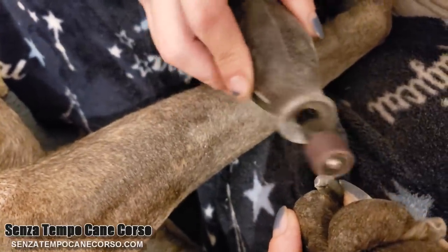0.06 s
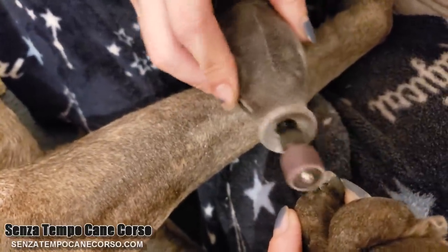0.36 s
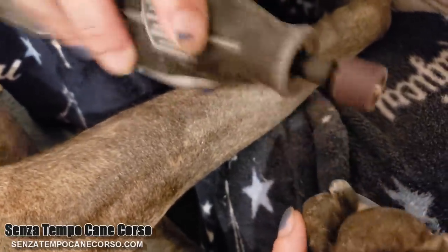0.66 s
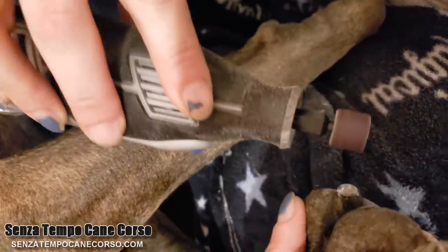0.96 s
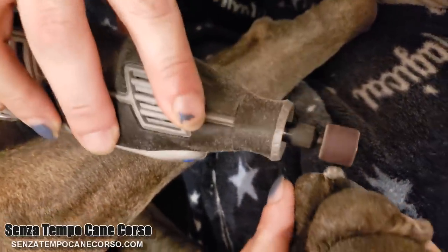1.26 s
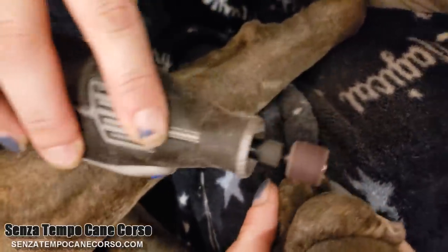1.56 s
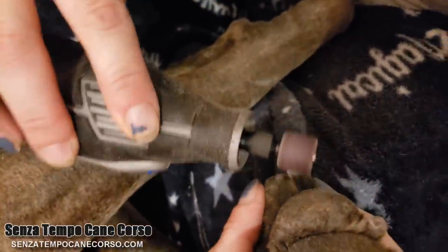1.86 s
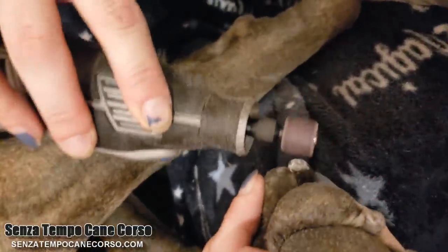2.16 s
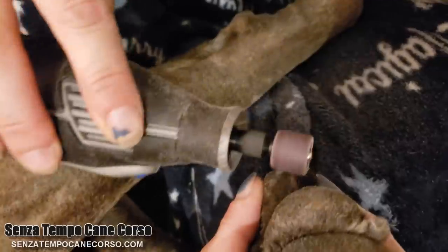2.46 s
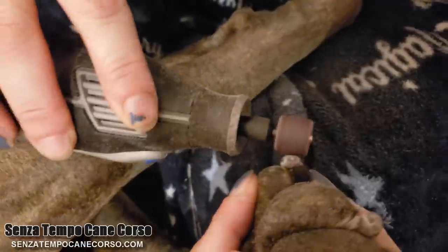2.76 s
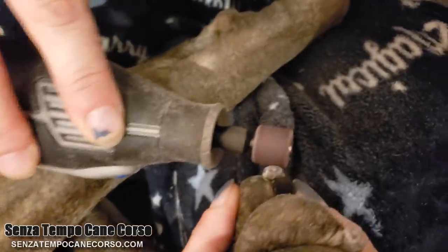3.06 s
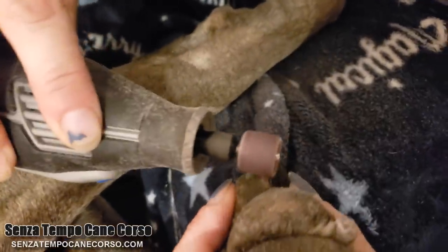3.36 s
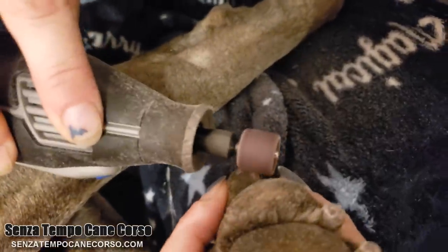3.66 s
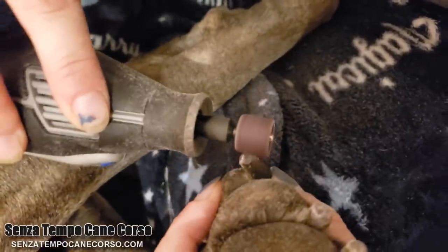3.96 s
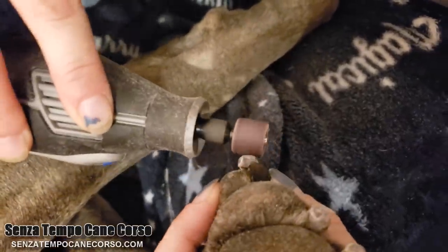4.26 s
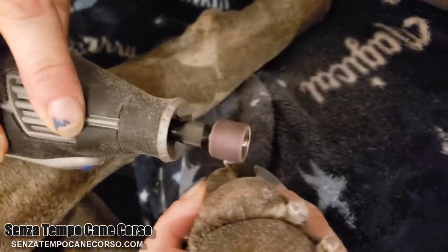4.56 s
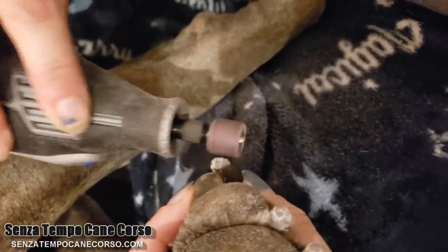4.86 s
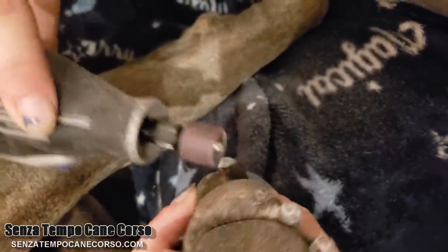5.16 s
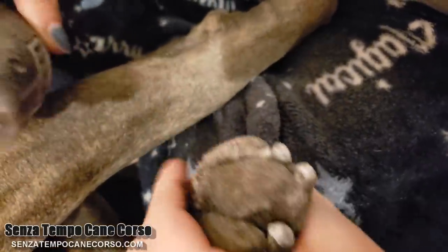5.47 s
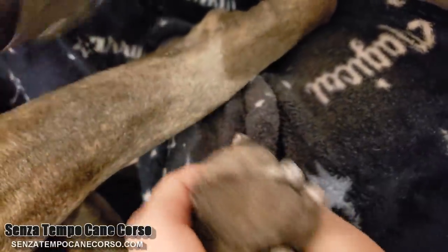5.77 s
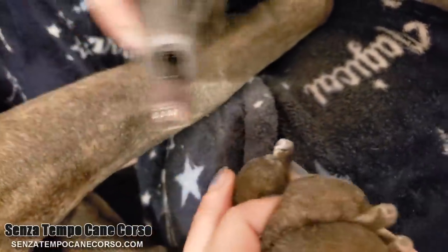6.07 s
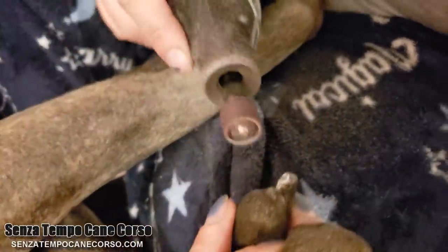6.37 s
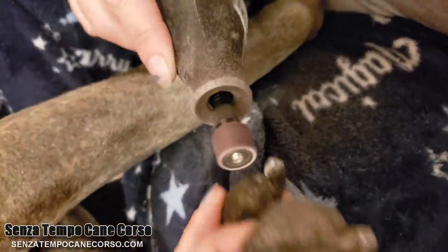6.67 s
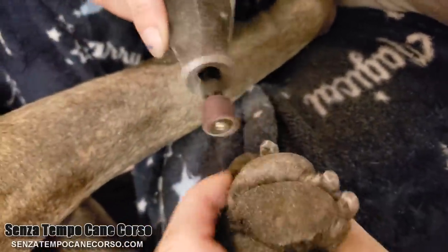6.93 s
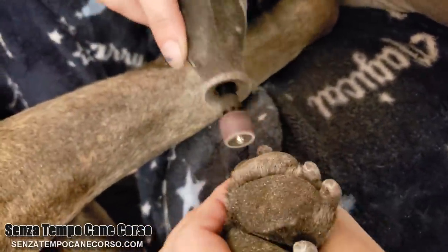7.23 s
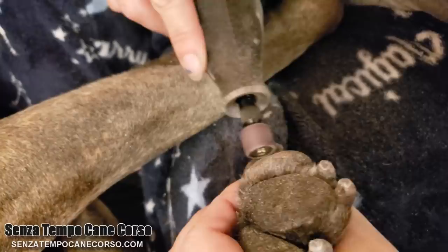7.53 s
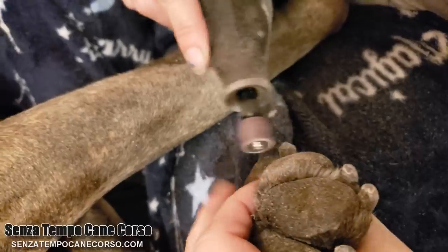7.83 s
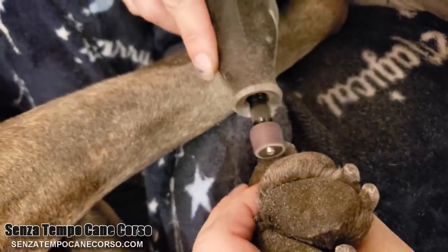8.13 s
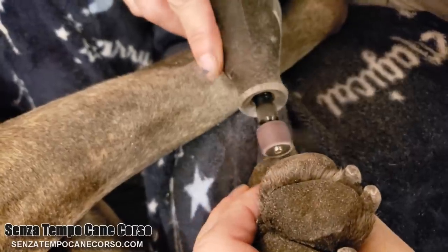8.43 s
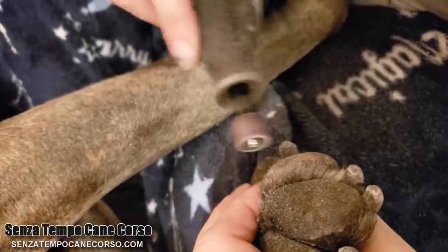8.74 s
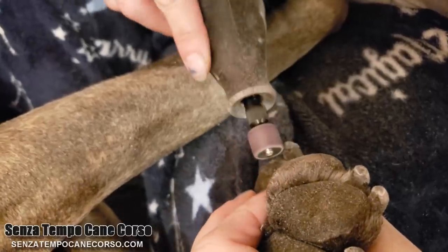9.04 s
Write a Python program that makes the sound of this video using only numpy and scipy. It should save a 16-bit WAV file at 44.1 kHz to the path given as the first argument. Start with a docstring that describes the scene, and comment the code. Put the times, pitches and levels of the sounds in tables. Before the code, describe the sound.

A handheld rotary tool whines steadily up close, rasping against a dog's nails in short strokes that make its pitch sag.

```python
"""A handheld rotary tool with a sanding drum grinds a dog's nails, close to the microphone.
From the start the shaft whines, the brushes buzz once per turn, and the shaft whirls and rattles in
its bearing at just under half speed. From 0.2 to 5.1 s, short strokes: the eccentric drum scrapes the
nail once per turn, snags and drags the speed down. Near 6 s the tool swings nose-on with a swish and
the paw is turned over with a soft shuffle. Two more strokes follow at 7.6 and 8.3 s."""
import sys
import numpy as np
from scipy import signal
from scipy.fft import rfft, irfft, next_fast_len
from scipy.io import wavfile
from scipy.ndimage import uniform_filter1d

SR = 44100
rng = np.random.default_rng(int(sys.argv[2]) if len(sys.argv) > 2 else 0)


def materialize(psi):
    """Save the field psi as 16-bit PCM at rate SR to the path in sys.argv[1].

    A 1-D psi becomes a single channel; in a 2-D psi each row is a channel.
    """
    bounded = np.clip(np.atleast_2d(psi).T, -1, 1)
    quanta = np.round(bounded * 32767).astype(np.int16)
    wavfile.write(sys.argv[1], SR, quanta)


N = 405719
TIME = np.arange(N) / SR

# Table levels are relative. nose: 0 = flank to the microphone, 1 = nose to it.
# tool pose: t/s, nose, motor level/dB
POSE = [(0, 0.46, 1.5), (.5, 0.53, 0), (.8, 0.053, 3), (1.3, 0.054, 2.5), (2.2, 0.059, 0.5),
        (2.75, 0.055, 0), (3.05, 0.019, 3), (3.5, 0.035, -1.5), (5.2, 0.012, -1.5), (5.55, 0.2, -0.5),
        (6.15, 0.83, 0.5), (6.55, 0.86, 1.5), (7.1, 0.98, 0.5), (7.5, 1, 4.5), (7.85, 0.97, 2),
        (8.25, 1, 3.5), (8.7, 0.95, 0), (9.2, 0.95, 1.5)]
# shaft tones: shaft order, flank-on/dB, nose-on/dB, left minus right/dB
SHAFT_TONES = [(2, -65.5, -80.5, 6), (4, -64, -59.5, 3), (5, -69, -56, 1), (6, -50.5, -51.5, 12),
               (9, -59, -59, 6), (18, -60, -60.5, 3), (19, -64, -52.5, -9), (20, -61, -63, 18),
               (22, -58.5, -67, -14), (30, -51, -58, 9), (33, -60, -57, 3), (45, -53, -61, 6),
               (65, -66, -56, 3), (66, -69, -53, 3)]
# whirl beating with the shaft: shaft order, whirl order, flank-on/dB, nose-on/dB
WHIRL_SIDEBANDS = [(3, -1, -68, -58), (3, 1, -95, -64), (5, 1, -58.5, -57.5), (6, -2, -66, -56.5),
                   (8, 1, -60.5, -62.5), (8, -2, -57, -61), (9, -2, -56, -65.5), (18, -1, -78, -60),
                   (19, -1, -76, -53)]
# once-per-turn part over the hiss: f/Hz, motor/dB, drum/dB
PERIODIC_RATIO = [(500, -8, 12), (2500, -7, 17), (4000, -3, 17), (6000, 0, 16), (8500, -6, 7),
                  (11500, 2, 3), (15000, 5, 1.5)]
# likeness of the two microphone ports: f/Hz, coherence
PORT_COHERENCE = [(300, 0.79), (1200, 0.64), (4000, 0), (9000, 0), (15000, 0.2)]
# buzz spectra, nose-on and flank-on: f/Hz, left/dB, right/dB
BUZZ_NOSE = [(256, -85, -92.5), (526, -85, -80), (800, -85.5, -79), (1150, -73.5, -80.5),
             (1590, -76.5, -85), (2100, -79, -77), (2680, -73, -82.5), (3020, -100.5, -107),
             (3400, -70.5, -75), (3610, -73, -79), (4630, -71.5, -75), (6450, -78.5, -85.5),
             (7230, -77, -87), (8100, -74.5, -72), (8650, -74.5, -65.5), (9500, -80.5, -82),
             (10400, -77.5, -76), (11850, -75.5, -67.5), (13200, -72, -74), (15400, -82, -75.5)]
BUZZ_FLANK = [(278, -91.5, -95), (780, -85, -88.5), (950, -73, -90), (1390, -77.5, -81), (1650, -67.5, -86),
              (2110, -80, -84.5), (2700, -75.5, -65.5), (2860, -73, -82), (3350, -71.5, -71.5),
              (4100, -85.5, -92.5), (4740, -75.5, -68.5), (5150, -70, -80), (6350, -72.5, -83),
              (6960, -74.5, -99), (7680, -67.5, -83), (8630, -71.5, -73.5), (9100, -74, -81.5),
              (10500, -74, -78.5), (12000, -70, -76), (14000, -77, -72), (15600, -68, -90)]
# bearing rattle: t/s, left/dB, right/dB
RATTLE_LEVEL = [(0, -42, -47), (.45, -37.5, -42), (.8, -47, -42), (1.7, -50, -37.5), (2.9, -48, -40),
                (3.3, -42, -35.5), (3.55, -50, -40), (3.8, -39, -39), (4.15, -52, -47), (4.86, -61, -59),
                (5.2, -51, -43), (5.45, -38.5, -50), (5.75, -40.5, -49), (5.95, -35.5, -43),
                (6.2, -36.5, -50), (6.5, -32.5, -43), (7.1, -35, -41), (7.45, -33.5, -38),
                (8.1, -37, -43.5), (9.2, -35, -42)]
# housing burr: t/s, level/dB
BURR_LEVEL = [(0, -42), (.9, -49.5), (2.87, -47), (3.5, -44), (4.86, -54), (5.2, -47), (5.4, -42),
              (5.55, -43), (5.75, -53), (5.95, -56), (6.5, -64), (7.45, -48), (7.95, -47), (9.2, -44.5)]
# brush sizzle: t/s, left/dB, right/dB
BRUSH_SIZZLE_LEVEL = [(0, -49, -44), (.45, -52, -45), (1.0, -51, -42), (1.7, -42, -45), (2.87, -47, -50),
                      (3.5, -39, -50), (4.3, -43, -55), (5.2, -43, -54), (5.75, -45, -44), (5.95, -37, -33),
                      (6.2, -43, -42), (6.45, -32, -36.5), (6.95, -40, -34.5), (7.15, -36.5, -41),
                      (7.45, -34, -37), (7.95, -46, -47), (8.2, -42, -41), (8.8, -52, -53),
                      (9.15, -33, -42)]
# room spectrum: f/Hz, left/dB, right/dB
ROOM_SPECTRUM = [(20.3, -105, -106), (45, -95, -96), (57.3, -84, -80), (76, -102, -103), (201, -103, -103),
                 (1000, -115, -115)]
# drum on nail: start/s, length/s, speed drag/Hz, thrum/dB, nail pitch ratio
STROKES = [ (.1735, .08, 62, -64, .93), (1.337, 0.2, 33, -66, .97), (1.768, 0.17, 28.7, -68, .97),
           (2.258, 0.027, 94, -75, .96), (2.324, .385, 27.6, -64.5, .93), (3.035, 0.17, 26, -70.5, .98),
           (3.203, 0.25, 40, -73, 1), (3.534, 0.011, 11, -78, 1), (3.599, 0.42, 40, -75, .99),
           (4.354, .157, 46.6, -70, 1.04), (4.545, 0.19, 43.5, -67, 1.02), (4.951, 0.14, 52, -79, 1.04),
           (7.566, .19, 26, -66, 1), (8.298, 0.3, 23.3, -71, 1), ]
# contact: t/s, scrape/dB, sizzle/dB, nail ring/dB, sizzle f/Hz, skip (0 pressed on, 1 once per turn)
CONTACT = [(0.177, -35, -37, -22.5, 14100.0, 0.31), (0.187, -29, -28.5, -21, 13500.0, 0.38),
           (0.21, -26, -26, -28, 14600.0, 0.81), (0.235, -29, -22, -31, 13700.0, 0.37),
           (0.252, -35, -24, -33, 14300.0, 0.58), (1.342, -25.5, -26, -37, 13600.0, 0.18),
           (1.375, -32.5, -29, -39, 13300.0, 0.43), (1.41, -23, -25, -36, 13400.0, 0.79),
           (1.447, -24.5, -37, -34, 12800.0, 0.5), (1.47, -25, -31, -39, 14300.0, 0.11),
           (1.505, -24.5, -23, -44, 14900.0, 0.11), (1.535, -27.5, -25, -39, 14900.0, 0.19),
           (1.778, -26.5, -27, -59, 14600.0, 0.02), (1.82, -29.5, -35, -43, 14400.0, 0.24),
           (1.87, -26, -28, -44, 14570, 0.023), (1.935, -25, -26, -36, 14580, 0.3),
           (2.263, -26, -30, -23.5, 12900.0, 0.35), (2.273, -24.5, -22, -28, 13140, 0.33),
           (2.286, -26, -34, -31, 13860, 0.32), (2.335, -27, -31, -32, 12400.0, 0.79),
           (2.375, -33, -31, -47, 14900.0, 1), (2.42, -24, -26, -30, 14400.0, 0.23),
           (2.47, -30, -28, -33, 13880, 0.4), (2.53, -29, -23, -35.5, 15500, 0.1),
           (2.61, -24, -30, -29.5, 13780, 0.02), (2.665, -26, -24, -31, 14360, 0.63),
           (2.685, -31, -38.0, -47, 15000, 0.48), (2.705, -25, -29, -39, 14900.0, 0.67),
           (3.045, -29.5, -35, -33.5, 12100.0, 0.48), (3.08, -32.5, -42, -38, 12520, 0.071),
           (3.13, -30, -38, -31.5, 12300.0, 0.26), (3.185, -26, -29, -37, 15200, 0.86),
           (3.235, -30.5, -26, -30.5, 14200, 0.35), (3.28, -32, -25, -45, 14600.0, 0.43),
           (3.3, -24.5, -24, -32, 14700, 0.11), (3.37, -26.5, -23.5, -55, 14190, 0.037),
           (3.445, -26, -27, -41, 14900.0, 0.14), (3.54, -38, -36.5, -43, 15200, 0.97),
           (3.605, -31.5, -30, -42, 15200, 0.02), (3.68, -30.5, -30, -57, 15060, 0.021),
           (3.74, -28.5, -28, -44, 15100, 0.019), (3.82, -30, -26, -56, 14720, 0.02),
           (3.89, -27, -29, -49, 14740, 0.048), (3.95, -27, -30, -40, 14560, 0.049),
           (3.98, -25.5, -32, -28.5, 14800.0, 0.56), (4.0, -29, -35, -56, 14800, 0.38),
           (4.03, -21.5, -35, -38, 15180, 0.73), (4.365, -31, -26.5, -33.5, 13600, 0.6),
           (4.41, -30, -28, -40, 14500, 0.24), (4.43, -27.5, -32, -30.5, 14700.0, 0.62),
           (4.46, -27.5, -25, -48, 14600, 0.99), (4.485, -29, -29, -36, 14100, 0.64),
           (4.51, -34.0, -31, -48, 14680, 0.58), (4.565, -33.5, -32, -54, 15220, 0.72),
           (4.62, -28, -29, -43, 14800, 0.26), (4.67, -30, -34, -39, 14800.0, 0.018),
           (4.71, -27, -31, -40, 14580, 0.11), (4.74, -25, -37, -35, 14790, 0.33),
           (4.955, -34, -28, -50, 14800.0, 0.58), (4.98, -42, -26, -40, 14800, 0.68),
           (5.0, -31, -32.0, -35, 14250, 0.38), (5.035, -33, -34, -37, 14140, 0.017),
           (5.068, -29, -24, -27.5, 13800, 0.019), (5.095, -26, -26, -31.5, 14230, 0.19),
           (7.575, -29, -37, -37, 13500, 0.02), (7.65, -32.5, -34, -31.5, 14040, 0.017),
           (7.745, -26.5, -35, -30, 13210, 0.061), (8.31, -48, -36.5, -46, 13860, 0.19),
           (8.39, -41, -28, -37.5, 14750, 0.54), (8.46, -28.5, -30, -40, 13900, 0.4),
           (8.56, -31, -29, -34, 14630, 0.082), (8.59, -28.5, -34, -61, 13430, 0.82)]
# spectrum of grit on nail: f/Hz, left/dB, right/dB
SCRAPE_SPECTRUM = [(121, -41, -32), (275, -6.5, -12), (970, 11, 4), (1710, 15, 3), (2100, 6.5, 1.5),
                   (2560, 14.5, 13.5), (2960, 8, 2.5), (3530, 6.5, 4.5), (4100, 6.5, 4.5), (6500, 11.5, 3),
                   (7800, 14.5, 1), (8340, 12.5, 8), (9400, 10, 5.5), (11200, 10, 11), (12900, 13, 7),
                   (14500, -2.5, 2)]
# scrape bands that swell and fade independently: f/Hz, width/Hz
WANDERING_BANDS = [(2700, 1000), (4200, 4000), (7500, 600), (11300, 1900), (13500, 350), (15200, 1600)]
# resonances of nail edge, nail tip and toe: f/Hz, width/Hz, level/dB
EDGE_MODES = [(430, 170, 3), (1070, 110, 23), (1620, 273, 25)]
TIP_MODES = [(901, 166, 8.3), (1085, 83, 2.9), (1578, 163, 12.4)]
TOE_MODES = [(360, 49, 7.5), (830, 830, -4.5)]
# drum catching the nail edge: t/s, level/dB
SNAGS = [(.1736, -19), (.1832, -24), (1.776, -28), (2.3232, -21.5), (2.3287, -21), (3.2475, -23),
         (3.2568, -22), (3.2762, -21.5), (4.4655, -23), (4.4708, -23), (4.7425, -20), (5.0975, -26)]
# toe shudders: peak t/s, rise/s, level/dB
SHUDDERS = [(1.447, 0.023, -39), (1.94, .01, -48), (2.668, 0.054, -54), (3.262, 0.021, -36),
            (4.0, 0.06, -48.5), (4.478, 0.024, -40), (4.748, 0.017, -43.5), (5.104, 0.0091, -43)]
# nail chatter: start/s, length/s, f/Hz, level/dB
CHATTERS = [(2.405, 0.036, 2700, -35), (2.59, 0.071, 2736, -36), (3.29, 0.14, 2442, -41),
            (3.72, 0.24, 2473, -48), (4.354, 0.052, 2383, -36.5), (5.045, 0.048, 2295, -36),
            (8.5, 0.1, 1473, -39.5)]
# tool swing: peak t/s, rise/s, level/dB
SWISH = [(5.92, .15, -37)]

FREE_SPEED_HZ, WHIRL_PER_TURN = 225.8, 0.46
TOUCH_S, LIFT_S = .007, .014


def amp(db):
    """Decibels to gain."""
    return np.exp(np.asarray(db) * (np.log(10) / 20))


def unit(x):
    """Scales to rms 1."""
    return x / np.sqrt(np.mean(x ** 2) + 1e-20)


def steady(x, window_s=.02):
    """Holds the short-term rms at 1."""
    return x / np.sqrt(abs(uniform_filter1d(x ** 2, round(window_s * SR))) + 1e-12)


def drift(hz):
    """Slow random wander, rms 1."""
    points = rng.standard_normal(N // 100)
    return unit(np.interp(TIME * hz * 2, np.arange(len(points)), points))


def curves(table):
    """Columns of a (t/s, ..) table at every sample."""
    times_s, *columns = np.transpose(table)
    return [np.interp(TIME, times_s, c) for c in columns]


def at_hz(hz, table):
    """Columns of an (f/Hz, ..) table at the given frequencies."""
    points_hz, *columns = np.transpose(table)
    return np.array([np.interp(np.log(hz + 1), np.log(points_hz), c) for c in columns])


def around(start_s, end_s):
    """Sample span with 0.5 s margins."""
    return slice(max(round((start_s - .5) * SR), 0), round((end_s + .5) * SR))


def flares(table, fall_s):
    """Gain of bursts with Gaussian rise and fall."""
    gain = np.zeros(N)
    for peak_s, rise_s, db in table:
        span = around(peak_s, peak_s)
        t = TIME[span] - peak_s
        gain[span] += amp(db) * np.exp(-np.minimum((t / np.where(t < 0, rise_s, fall_s)) ** 2, 20))
    return gain


def highpass(x, hz):
    """Second-order high-pass."""
    return signal.sosfilt(signal.butter(2, hz, "high", fs=SR, output="sos"), x)


def colour(pair, spectrum, size=2048):
    """Minimum-phase filter with a left and a right spectrum."""
    gain = amp(at_hz(np.fft.rfftfreq(size, 1 / SR), spectrum))
    cepstrum = irfft(np.log(gain), axis=1)
    cepstrum[:, 1:size // 2] *= 2
    cepstrum[:, size // 2 + 1:] = 0
    impulse = irfft(np.exp(rfft(cepstrum, axis=1)), axis=1)
    return signal.oaconvolve(pair, impulse, axes=1)[:, :N]


def ring(x, modes):
    """Parallel resonances, each applied twice for steep skirts; rms 1."""
    out = 0
    for hz, width_hz, db in modes:
        b, a = signal.iirpeak(hz, hz / (2 * width_hz), SR)
        out = out + amp(db) * signal.lfilter(b, a, signal.lfilter(b, a, x))
    return unit(out)


def swept(x, hz, width_hz):
    """Steep resonance that follows the curve hz."""
    carrier = np.exp(2j * np.pi * np.cumsum(hz) / SR)
    r = np.exp(-np.pi * width_hz / SR)
    return 2 * (carrier * signal.lfilter([(1 - r) ** 2], [1, -2 * r, r * r], x / carrier)).real


def resonance(pair, hz, width_hz):
    """One steep resonance on both channels, rms held at 1."""
    return np.array([steady(swept(x, hz * np.ones(N), width_hz), window_s=.15) for x in pair])


def nearby(x, pan_db, lag_samples=14):
    """Small source on the left: louder there, later on the right."""
    return np.array([amp(pan_db / 2) * x, amp(-pan_db / 2) * np.roll(x, lag_samples)])


def ports(hiss, periodic=None, ratio_column=0, lag_s=.00027):
    """Hiss plus an optional periodic part at two microphone ports; the right is partly alike, later."""
    size = next_fast_len(N, True)
    hz = np.fft.rfftfreq(size, 1 / SR)
    spectra = rfft(hiss, size, axis=1)
    if periodic is not None:
        ratio = amp(at_hz(hz, PERIODIC_RATIO)[ratio_column])
        spectra = (spectra + ratio * rfft(periodic, size, axis=1)) / np.sqrt(1 + ratio ** 2)
    left, other = spectra
    coherence = np.clip(at_hz(hz, PORT_COHERENCE)[0], 0, 1)
    delay = np.exp(-2j * np.pi * hz * lag_s)
    right = coherence * delay * left + np.sqrt(1 - coherence ** 2) * other
    return irfft(np.array([left, right]), size, axis=1)[:, :N]


def surface(turns, bunching, uneven_db=1.5, orders=80, size=4096):
    """Random surface passing once per turn; bunching aligns its orders into a pulse."""
    lines = np.exp(1j * rng.uniform(-np.pi, np.pi, orders)) + bunching
    gains = amp(uneven_db * rng.standard_normal(orders))
    shape = irfft(np.r_[0, gains * lines / abs(lines)], size)
    return unit(np.interp(turns % 1 * size, np.arange(size), shape))


def shifting_buzz(turns, drift_hz, bunching):
    """Per channel, a once-per-turn buzz whose harmonics drift in strength."""
    def side():
        blend = drift(drift_hz)
        return unit(np.cos(blend) * surface(turns, bunching) + np.sin(blend) * surface(turns, 0))
    return np.array([side(), side()])


def throb(cycles, sharpness):
    """One swell per cycle, rms 1."""
    return unit(np.exp(sharpness * np.cos(2 * np.pi * cycles)))


def facing(nose, flank_value, nose_value):
    """Blend from flank-on to nose-on."""
    return flank_value + nose * (nose_value - flank_value)


def tone(cycles, db, pan_db, waver_db, lag_cycles=0.22):
    """Stereo sine of wavering level; the right lags."""
    gain = np.sqrt(2) * amp(db + waver_db * drift(14))
    left = amp(pan_db / 2) * np.sin(2 * np.pi * cycles)
    right = amp(-pan_db / 2) * np.sin(2 * np.pi * (cycles - lag_cycles))
    return gain * np.array([left, right])


def shaft_speed_hz(inertia_s=0.41, first_sag_hz=12.2, lean_in=0.85):
    """Drag grows as the hand leans into each stroke; inertia smooths sag and recovery."""
    drag_hz = np.zeros(N)
    for start_s, length_s, mean_hz, *_ in STROKES:
        span = slice(round(start_s * SR), round((start_s + length_s) * SR))
        progress = (TIME[span] - start_s) / length_s
        drag_hz[span] += mean_hz * (1 + lean_in * (progress - .5))
    pole = np.exp(-1 / (inertia_s * SR))
    return FREE_SPEED_HZ - signal.lfilter([1 - pole], [1, -pole], drag_hz, zi=[first_sag_hz])[0]


def armature_whine(turns, speed_hz, nose, level_db, sag_db_per_hz=0.2):
    """Unbalance hums at order 1; three poles whine at order 3, fainter as the motor slows."""
    hum_db = level_db + facing(np.minimum(nose / 0.19, 1), -76, -61.5)
    hum = tone(turns, hum_db, pan_db=0.74, waver_db=.8, lag_cycles=0.084)
    whine_db = level_db + facing(nose, -48.5, -44) - sag_db_per_hz * (FREE_SPEED_HZ - speed_hz)
    return hum + tone(3 * turns, whine_db, pan_db=6 - 7.9 * nose, waver_db=.8, lag_cycles=0.082)


def housing_tone(turns, speed_hz, nose, level_db, mode_hz=2613, width_hz=122):
    """Order 12 sings as it crosses the housing resonance, which radiates sideways."""
    detuning = (12 * speed_hz - mode_hz) / (width_hz / 2)
    db = level_db + facing(nose, -37, -42.5) - 10 * np.log10(1 + detuning ** 2)
    singing = tone(12 * turns, db, pan_db=-7 + 7 * nose, waver_db=.7, lag_cycles=0.3)
    return singing * unit(1 + .12 * drift(70))


def shaft_whine(turns, nose, level_db, flutter_db=3):
    """Shaft orders and whirl sidebands; nose-on they throb as twice the whirl beats with the shaft."""
    base_db = level_db + flutter_db * nose * np.cos(2 * np.pi * (1 - 2 * WHIRL_PER_TURN) * turns)
    out = 0
    for order, flank_db, nose_db, pan_db in SHAFT_TONES:
        out += tone(order * turns, base_db + facing(nose, flank_db, nose_db), pan_db, waver_db=1.1)
    for order, whirl_order, flank_db, nose_db in WHIRL_SIDEBANDS:
        cycles = (order + whirl_order * WHIRL_PER_TURN) * turns
        out += tone(cycles, base_db + facing(nose, flank_db, nose_db), pan_db=4.4, waver_db=3)
    return out


def chopper_whistle(turns, nose, chopper_hz=8023):
    """Thin whistle of the speed control, with two armature sidebands."""
    cycles = chopper_hz * TIME
    out = tone(cycles, -49 - 9 * nose, pan_db=2.8, waver_db=1.5)
    out += tone(2 * cycles - 3 * turns, -50 - 9 * nose, pan_db=5, waver_db=3)
    return out + tone(cycles + 3 * turns, -51 - 3 * nose, pan_db=2.1, waver_db=2.2)


def brush_ticks(turns, nose, flank_tick_db=-6):
    """Brushes tick over the commutator in a hiss of air; both swell with the whirl."""
    hiss = rng.standard_normal((2, N)) * throb(turns, 0.048)
    ticks = shifting_buzz(turns, drift_hz=0.711, bunching=0.58) * amp(flank_tick_db * (1 - nose))
    return ports(hiss, ticks) * throb(WHIRL_PER_TURN * turns, 0.15) * amp(0.67 * drift(40))


def brush_buzz(ticks, nose, level_db):
    """Brush ticks coloured by the pose, plus their bright sizzle."""
    buzz = np.sqrt(nose) * colour(ticks, BUZZ_NOSE) + np.sqrt(1 - nose) * colour(ticks, BUZZ_FLANK)
    buzz = np.sqrt(SR / 2) * amp(level_db) * highpass(buzz, 200)
    sizzle = resonance(ticks, hz=facing(nose, 15300, 14730), width_hz=1500)
    return buzz + amp(curves(BRUSH_SIZZLE_LEVEL)) * sizzle


def bearing_rattle(ticks, turns):
    """The whirling shaft knocks in its bearing, rings the nose and shakes the housing."""
    whirl_cycles = WHIRL_PER_TURN * turns + .015 * drift(30)
    knocks = ticks * throb(whirl_cycles, sharpness=0.41) * amp(2 * drift(60))
    rattle = amp(curves(RATTLE_LEVEL)) * resonance(knocks, hz=4248, width_hz=720)
    burr = amp(curves(BURR_LEVEL)) * resonance(knocks, hz=2447, width_hz=300)
    return rattle + amp([[0.5], [-0.5]]) * burr


def room_rumble():
    """Faint low noise of a quiet room."""
    return np.sqrt(SR / 2) * colour(ports(rng.standard_normal((2, N))), ROOM_SPECTRUM)


def strokes():
    """Touch (0-1), thrum gain and nail pitch ratio; the drum lands fast and lifts more slowly."""
    touching, thrum_gain, tuning = np.zeros(N), np.zeros(N), np.ones(N)
    for start_s, length_s, _, thrum_db, pitch_ratio in STROKES:
        span = around(start_s, start_s + length_s)
        t = TIME[span] - start_s
        touch = np.clip(t / TOUCH_S + .5, 0, 1) * np.exp(-np.clip((t - length_s) / LIFT_S, 0, 20))
        touching[span] = np.maximum(touching[span], touch)
        thrum_gain[span] = np.maximum(thrum_gain[span], amp(thrum_db) * touch)
        tuning[round(start_s * SR):] = pitch_ratio
    return touching, thrum_gain, tuning


def wander(x, rate_hz=18, depth_db=3.5):
    """The colour shifts as the contact point moves over the nail."""
    for hz, width_hz in WANDERING_BANDS:
        band = signal.lfilter(*signal.iirpeak(hz, hz / width_hz, SR), x)
        x = x + band * (amp(depth_db * drift(rate_hz)) - 1)
    return x


def grit_scrape(turns, pressure, skip, scrape_gain, sizzle_gain, sizzle_hz):
    """Grit rasps, the finest sizzles; a skipping drum meets fresh grit and crackles more than buzzes."""
    grains = unit(rng.standard_normal((2, N)) * amp(1.2 * rng.standard_normal(N)))
    grit = ports(grains, shifting_buzz(turns, drift_hz=6, bunching=0.48), ratio_column=1)
    fresh = np.clip(skip, 0, 1) ** 3
    grit = np.sqrt(1 - fresh) * grit + np.sqrt(fresh) * ports(rng.standard_normal((2, N)))
    rasp = wander(colour(grit * pressure ** 0.63, SCRAPE_SPECTRUM))
    rasp /= np.sqrt(uniform_filter1d((rasp ** 2).mean(0), size=1800) + 1e-12)
    sizzle = steady(wander(swept(grit * pressure, sizzle_hz, width_hz=4070)))
    return scrape_gain * rasp + sizzle_gain * amp([[1.4], [-2.4]]) * sizzle


def nail_ring(push, nose, tuning):
    """The nail rings at its edge (flank-on) or tip (nose-on); pitch shifts with the contact point."""
    tuning = tuning * (1 + .015 * drift(10))
    edge, tip = (steady(sum(amp(db) * swept(push, hz * tuning, width_hz) for hz, width_hz, db in modes))
                 for modes in (EDGE_MODES, TIP_MODES))
    body = highpass(np.sqrt(1 - nose) * edge + np.sqrt(nose) * tip, 300)
    return amp(-2.5) * nearby(steady(body), pan_db=13.1)


def drum_thrum(turns, bite, octave_db=5.5):
    """The pressing drum thrums at shaft speed and its octave."""
    angle = 2 * np.pi * turns
    return 2 * nearby(bite * (np.cos(angle) + amp(octave_db) * np.cos(2 * angle)), pan_db=4.5)


def toe_shudder(push, pressure, scrape_gain):
    """The toe resonates faintly under the scrape and shudders in bursts."""
    gain = np.hypot(amp(-36) * scrape_gain, flares(SHUDDERS, fall_s=0.015))
    body = ring(0.57 * push + pressure * rng.standard_normal(N), TOE_MODES)
    return amp(-0.5) * gain * nearby(steady(body), pan_db=8.5)


def snags(fade_s=0.0011, above_hz=4800):
    """Short bright scratches where grit catches an edge."""
    clicks = np.zeros(N)
    for time_s, db in SNAGS:
        clicks[round(time_s * SR)] += amp(db)
    bursts = signal.lfilter([1], [1, -np.exp(-1 / (fade_s * SR))], clicks + 1e-18)
    return highpass(colour(bursts * rng.standard_normal((2, N)), SCRAPE_SPECTRUM), above_hz)


def nail_chatter(push):
    """Pressed hard, the nail chatters once per turn in a further resonance."""
    gain, centre_hz = np.zeros(N), np.full(N, float(CHATTERS[0][2]))
    for start_s, length_s, hz, db in CHATTERS:
        end_s = start_s + length_s
        gain += amp(db) * np.interp(TIME, [start_s, start_s + TOUCH_S, end_s, end_s + LIFT_S], [0, 1, 1, 0])
        centre_hz[round(start_s * SR):] = hz
    return gain * nearby(steady(swept(push, centre_hz, width_hz=450)), pan_db=10, lag_samples=4)


def grinding(turns, nose, uneven_db=0.2, roughness=0.41):
    """The drum's high side bites once per turn; each bite fades, sooner when the drum skips."""
    touching, thrum_gain, tuning = strokes()
    *levels_db, sizzle_hz, skip = curves(CONTACT)
    scrape_gain, sizzle_gain, nail_gain = touching * amp(levels_db)
    bite = amp(uneven_db * (0.5 + skip) * rng.standard_normal(N)[turns.astype(int)])
    fade_turns = np.interp(skip, [0, 1], [0.13, 0.051])
    rest_pressure = np.interp(skip, [0, 1], [0.39, 0.023])
    pressure = steady(rest_pressure + np.exp(-(turns % 1) / fade_turns))
    out = bite * grit_scrape(turns, pressure, skip, scrape_gain, sizzle_gain, sizzle_hz)
    push = bite * (surface(turns, bunching=1.1) + roughness * pressure * rng.standard_normal(N))
    out += nail_gain * nail_ring(push, nose, tuning) + thrum_gain * drum_thrum(turns, bite)
    return out + toe_shudder(push, pressure, scrape_gain) + nail_chatter(push)


def tool_swish():
    """Airy swish as the tool swings back to the paw."""
    return flares(SWISH, fall_s=.12) * resonance(rng.standard_normal((2, N)), hz=5670, width_hz=3400)


def paw_shuffle(hz=97.8, width_hz=29.8):
    """Soft low shuffle as the paw is turned over."""
    level_db = np.interp(TIME, [6.25, 6.35, 6.55, 6.75, 6.9], [-110, -65, -67, -62, -110])
    return amp(level_db) * ring(rng.standard_normal(N), [(hz, width_hz, 0)])


def scene():
    """One shaft angle drives motor and drum."""
    speed_hz = shaft_speed_hz()
    nose, level_db = curves(POSE)
    turns = np.cumsum(speed_hz * (1 + .0003 * drift(25))) / SR
    motor = armature_whine(turns, speed_hz, nose, level_db)
    motor += housing_tone(turns, speed_hz, nose, level_db)
    motor += shaft_whine(turns, nose, level_db) + chopper_whistle(turns, nose)
    ticks = brush_ticks(turns, nose)
    motor += brush_buzz(ticks, nose, level_db) + bearing_rattle(ticks, turns)
    return motor + grinding(turns, nose) + snags() + paw_shuffle() + tool_swish() + room_rumble()


def record(dry):
    """Steep low-pass at 15.76 kHz."""
    taps = signal.firwin(1023, 15760, window=("kaiser", 8), fs=SR)
    return signal.oaconvolve(dry, taps[None], "same", axes=1)


dry = scene()
out = record(dry)
materialize(out)
```